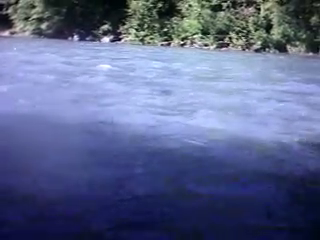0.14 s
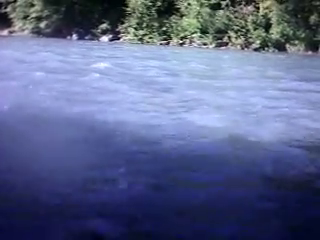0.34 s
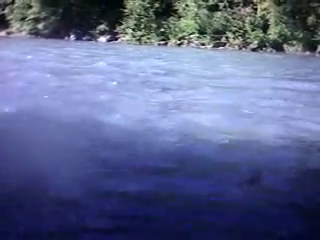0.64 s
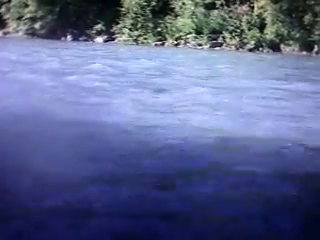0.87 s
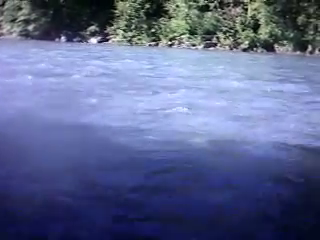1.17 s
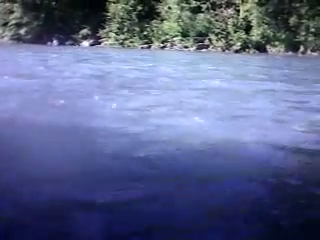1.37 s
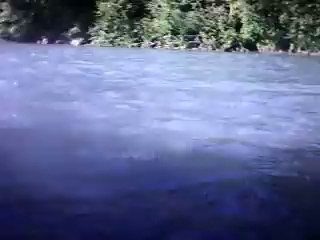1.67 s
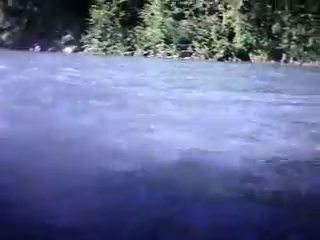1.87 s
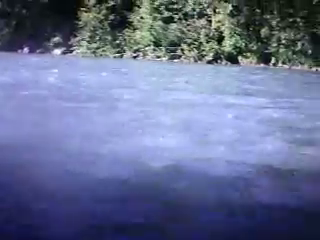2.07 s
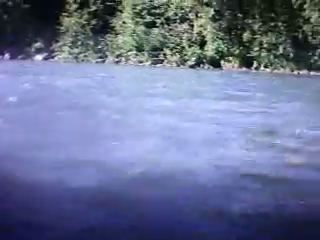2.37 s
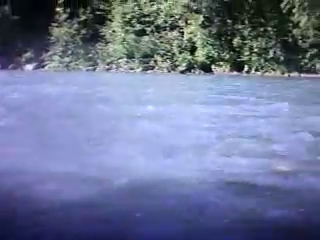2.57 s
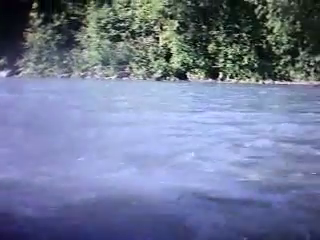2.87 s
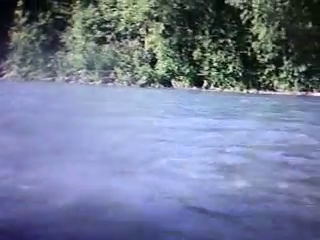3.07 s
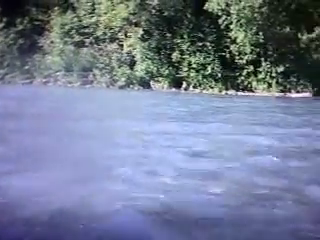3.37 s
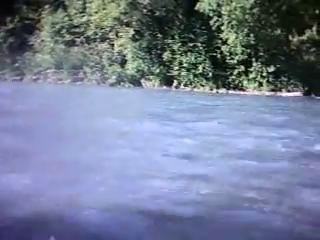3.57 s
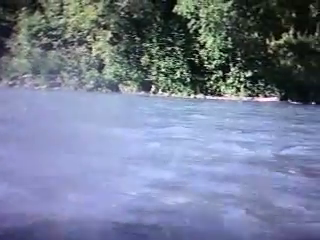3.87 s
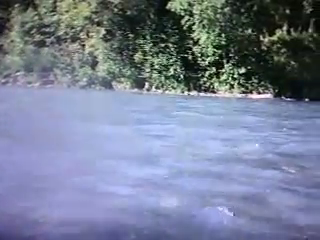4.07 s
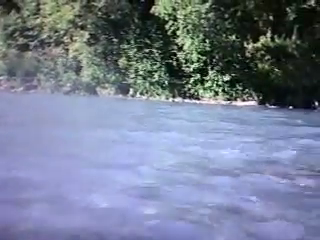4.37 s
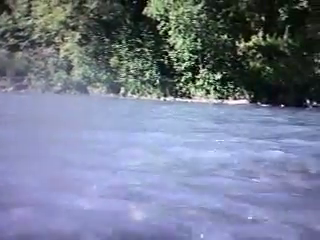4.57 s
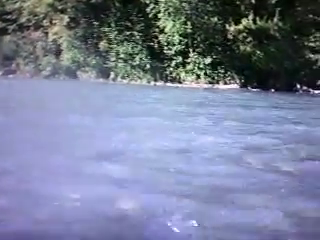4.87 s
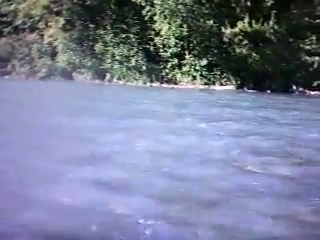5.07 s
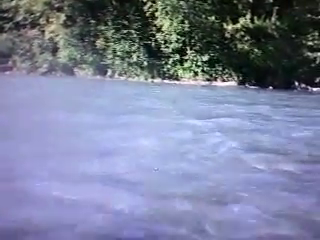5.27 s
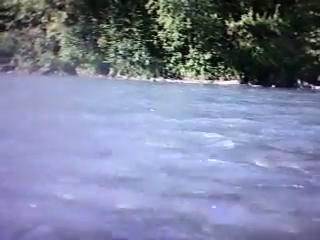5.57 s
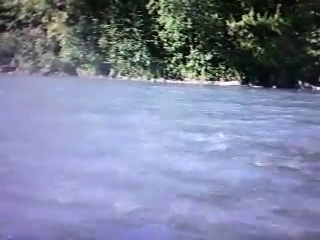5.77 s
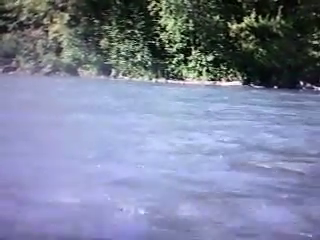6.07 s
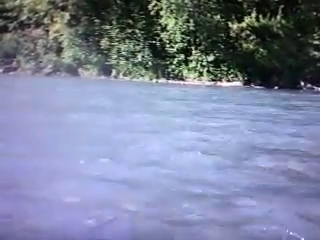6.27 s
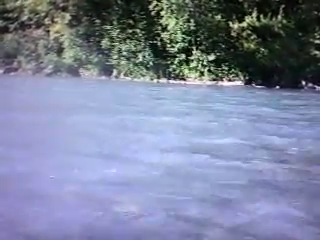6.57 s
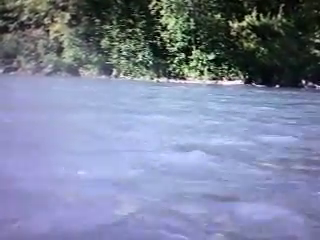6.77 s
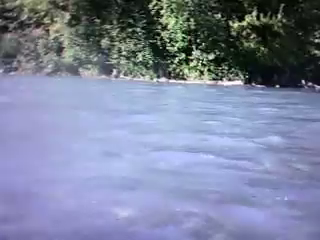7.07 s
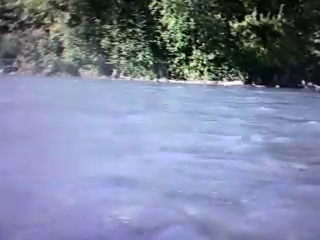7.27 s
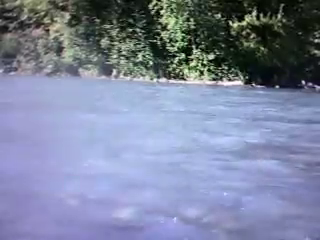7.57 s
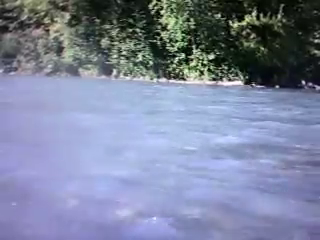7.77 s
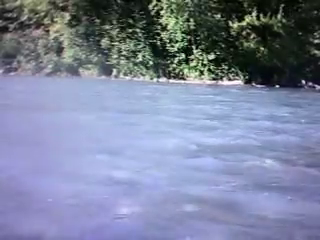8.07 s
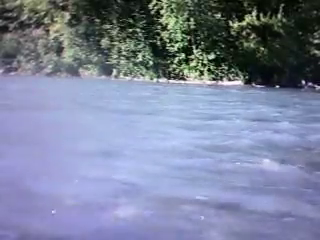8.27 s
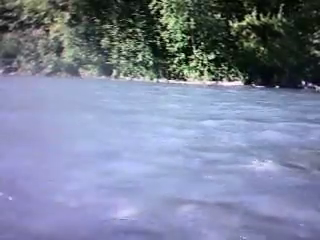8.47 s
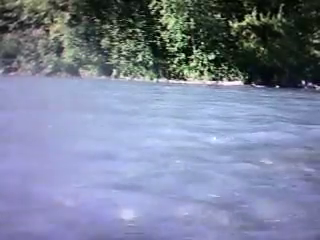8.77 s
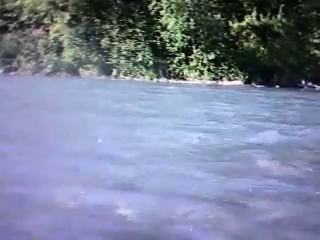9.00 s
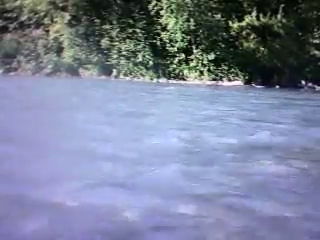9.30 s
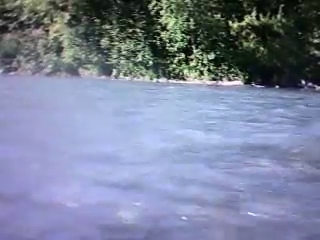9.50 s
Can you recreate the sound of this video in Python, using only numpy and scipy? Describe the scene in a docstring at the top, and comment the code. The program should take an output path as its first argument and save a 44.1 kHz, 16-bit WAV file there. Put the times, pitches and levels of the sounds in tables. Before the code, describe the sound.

A quad bike revs in a river, its exhaust right at the waterline, over a soft, steady rush of current. From the start until about 4.7 seconds come roughly nine quick throttle blips, the longest from 3.6 to 4.2 seconds. Each blows the pipe clear with a hard bark; between them water covers it and the sound becomes a muffled, thumping gurgle. Hollow pops and sharp cracks pepper the revs, with a strong crack near 2.5 seconds. Around 5 seconds the engine sinks into a quieter, lumpy idle with a low drone, a hollow chuff and a faint metallic knock. A drop of spray ticks near 5.4 seconds, a loud pop follows at 5.7 and a weaker one at 8.7. The idle swells slightly toward the end, near 9.5 seconds. The small microphone has little treble and overloads on the barks.

```python
"""A quad bike revs in a river, its exhaust at the waterline: blip after blip, then a lumpy idle.
Each firing thumps in the silencer and puffs out gas, a muffled gurgle while water covers the pipe,
a hard bark when it blows clear. The exhaust pops and cracks; the idle adds a drone and a chuff.
The river is a steady bed with one tick of spray. A small narrow-band microphone overloads on the barks."""
import sys
import numpy as np
from scipy import signal
from scipy.fft import rfft, irfft
from scipy.io import wavfile

SR = 44100
rng = np.random.default_rng(int(sys.argv[2]) if len(sys.argv) > 2 else 0)


def pcm_store(signal):
    """Save signal as 16-bit PCM."""
    levels = np.round(np.clip(np.atleast_2d(signal), -1, 1) * 32767)
    wavfile.write(sys.argv[1], SR, levels.astype(np.int16).T)


N = 425124
T = np.arange(N) / SR

# throttle blips: t/s, hold/s, target firing rate/Hz, pipe open/s, flooding decay/s, gas level/dB
BLIPS = [(-.2, 0.34, 78.8, 0.36, 0.1, 7.5), (.588, .14, 72, 0.16, .08, -5),
         (1.066, 0.32, 79.6, 0.377, 0.046, 3), (1.732, .17, 82.2, 0.2858, 0.064, 3.5),
         (2.02, .12, 88, 0.37, 0.044, -1), (2.497, 0.18, 81.4, .32, 0.011, -2.5),
         (3.053, .11, 77, 0.11, 0.085, 4), (3.586, 0.6, 79.7, 0.97, .08, 3),
         (4.37, .11, 85, .32, 0.08, 2.5)]
# accents on the four firings of a cycle: revved level/dB, idle level/dB
ACCENTS = [(3, -5.5), (1.5, -6), (-1, -4.5), (-0.5, -8.5)]
# resonances rung by the gas: f/Hz, width/Hz, muffled level/dB, clear level/dB, pop level/dB
GAS_MODES = [(261.6, 58, 2.5, -23.5, -3.5), (309, 59, -15, 2, -2), (476, 760, -1.5, -9.5, -12.5),
             (782.8, 35.7, 9.5, -29.5, -0.5), (1024.4, 104, 1, 4, -0.5), (1108.2, 67, 8, 7.5, -5),
             (1136, 13, -34.5, -14.5, -1), (1507, 100, 0, -7, -28), (2196, 130, -41, -6.5, -25),
             (3040, 170, -38.5, -20, -20.5)]
MUFFLED, CLEAR, POP = 2, 3, 4  # its level columns
# tone colour of the river: f/Hz, relative level/dB
RIVER_SPECTRUM = [(100, 17), (250, 3.5), (400, -17.5), (700, 2), (1100, 11), (1500, -8), (1900, -2.5),
                  (2500, -4.5), (3300, -8), (4000, -18)]
# single exhaust pops and cracks, between the blips, during them and at idle:
# t/s, pop level/dB, snap level/dB
EXHAUST_POPS = [(.283, -10, -12), (.34, -8.5, 5.5), (.463, -4.5, -6), (.529, -3.5, 6), (.818, 0, -12),
                (.942, 3.5, -8), (1.011, -3, -11), (1.033, -3, 4), (1.462, -8, 9), (1.487, -2, -17),
                (1.59, -3, -6), (1.607, -3, 6.5), (2.53, -6, 23.5), (2.786, 3, 0), (2.962, -22, -14),
                (3.026, -1, -15), (3.09, -2, 11), (3.255, 1.5, -1.5), (3.322, -6, 6.5), (3.385, 7, 7),
                (3.443, -13, 5), (3.526, -2, 1.5), (4.747, -6, -4), (4.836, -11, -27), (4.983, -15.5, -53),
                (5.288, -18, -45), (5.372, -9.5, -45), (5.699, 8.5, 1), (5.724, -1.5, -12),
                (7.771, -26, -48), (8.345, -33.5, -37), (8.71, -18.5, -34), (8.715, -8, -33)]
# the idle settles, then swells a little: t/s, gas gain/dB, thump gain/dB
IDLE_SWELL = [(4.9, 7, 6), (5.8, 3, 3.5), (6.15, -1, 1), (6.6, -1, 1.5), (7.5, -1, 0.5), (8.3, 1.5, 2),
              (9.64, 3, 1)]
# partials of the idle drone: multiple of the cycle rate, relative level/dB
DRONE_PARTIALS = [(1, -51), (2, -34.5), (3, -39), (4, -12), (5, 0.5), (6, -16), (7, -6), (8, -9.5),
                  (9, -8.5), (10, -12), (11, -8), (12, -8), (13, -11.5)]

CRUISE_HZ, IDLE_HZ, LET_GO_S = 60.02, 43.2, 4.68  # firing rates on light throttle and once it is let go
SPIN_UP_S, SPIN_DOWN_S = .055, .18
CLEAR_S, SURGE_S = 0.038, 0.047  # gas shoves the water off the pipe, hardest at first
THUMP_LEAD_S = 0.037  # the thump builds against the water before the gas gets through
GAS_COVERED_DB, GAS_IDLE_DB, GAS_SURGE_DB = -26, -27, 3
THUMP_COVERED_DB, THUMP_CLEAR_DB, THUMP_IDLE_DB, THUMP_SURGE_DB = -18.5, -13.5, -20.5, 5.5
POP_DECAY_S, POP_SLOWER_DB = 0.0068, 29.5  # weak pops linger: decay at 0 dB, level drop that doubles it
CHUFF_S = 6.0  # one idle chuff lands here


def undb(db):
    """Decibels to gain."""
    return 10 ** (np.asarray(db) / 20)


def unit(x):
    """Scale to rms 1."""
    return x / np.sqrt(np.mean(x ** 2))


def butter(x, hz, kind, order=2):
    """Low-pass or high-pass."""
    return signal.sosfilt(signal.butter(order, hz, kind, fs=SR, output="sos"), x)


def ring(x, hz, width_hz):
    """One resonance, gain 1 at its centre."""
    return signal.lfilter(*signal.iirpeak(hz, hz / width_hz, fs=SR), x)


def wander(rate_hz):
    """Random modulation that glides from value to value."""
    knots = rng.standard_normal(2000)
    return 1.9 * np.interp(T * rate_hz, np.arange(len(knots)), knots)


def puff(age, rise_s, decay_s):
    """Envelope of a flow that opens quickly and dies away."""
    age = np.maximum(age, 0)
    return (1 - np.exp(-age / rise_s)) * np.exp(-age / decay_s)


def firing_rate():
    """Firings per second: the engine spins up quickly on the throttle and runs down slowly off it."""
    moves = []
    for start, hold_s, hz, *_ in BLIPS:
        moves += [(start, hz, SPIN_UP_S), (start + hold_s, CRUISE_HZ, SPIN_DOWN_S)]
    rate = np.full(N, CRUISE_HZ)
    for start, hz, lag_s in moves + [(LET_GO_S, IDLE_HZ, SPIN_DOWN_S)]:
        i = max(int(start * SR), 0)
        rate[i:] = hz + (rate[i] - hz) * np.exp((start - T[i:]) / lag_s)
    return rate


def exhaust_levels(idling):
    """Gas and thump envelopes in dB: each blip blows the pipe clear with a surge, then water returns."""
    def lift(age, open_s, flood_s, rise_db, surge_db):
        age = np.maximum(age, 0)
        clear = np.minimum(age / CLEAR_S, 1) * np.exp(-np.maximum(age - open_s, 0) / flood_s)
        return clear * (rise_db + surge_db * np.exp(-age / SURGE_S))
    gas_db, thump_db = np.zeros((2, N))
    thump_rise_db = THUMP_CLEAR_DB - THUMP_COVERED_DB
    for start, _, _, open_s, flood_s, db in BLIPS:
        gas_lift = lift(T - start, open_s, flood_s, db - GAS_COVERED_DB, GAS_SURGE_DB)
        thump_lift = lift(T - start + THUMP_LEAD_S, open_s, flood_s, thump_rise_db, THUMP_SURGE_DB)
        gas_db, thump_db = np.maximum(gas_db, gas_lift), np.maximum(thump_db, thump_lift)
    times, gas_swell, thump_swell = np.transpose(IDLE_SWELL)
    gas_db += (1 - idling) * GAS_COVERED_DB + idling * (GAS_IDLE_DB + np.interp(T, times, gas_swell))
    thump_db += (1 - idling) * THUMP_COVERED_DB
    thump_db += idling * (THUMP_IDLE_DB + np.interp(T, times, thump_swell))
    return gas_db, thump_db


def engine():
    """Four firings a cycle drive the thump, the gas blast, and at idle the drone and the chuff."""
    rate = firing_rate()
    phase = np.cumsum(rate) / SR
    phase += -phase[int(CHUFF_S * SR)] % len(ACCENTS)  # a cycle begins at the chuff
    firing, age, cycles = phase.astype(int), phase % 1 / rate, phase / len(ACCENTS)
    idling = np.clip((62 - rate) / 15, 0, 1)  # crossfade: 0 revved, 1 at idle
    gas_db, thump_db = exhaust_levels(idling)
    revved_db, idle_db = np.array(ACCENTS)[firing % len(ACCENTS)].T
    accent_db = (1 - idling) * revved_db + idling * idle_db
    low_end = thump(firing, age, idling, accent_db) + undb(-5) * idling * drone(cycles)
    gas = blast(firing, age, idling, gas_db, accent_db)
    return undb(thump_db) * low_end + gas + idling * chuff(cycles, rate)


def thump(firing, age, idling, accent_db):
    """Uneven pressure pulses boom in the silencer and bubble at the pipe's mouth."""
    level_jitter, time_jitter = rng.standard_normal((2000, 2))[firing].T
    size = undb((2.5 - idling) * level_jitter + .3 * accent_db)
    late_s = 0.0012 * np.abs(time_jitter)  # water holds some pulses back
    pulses = butter(size * puff(age - late_s, 0.0023, 0.0015), 28, "high")
    boom = unit(butter(pulses, 230, "low") + 9.5 * ring(pulses, 48.8, 5.5) + 4.25 * ring(pulses, 76.7, 20))
    churn = rng.standard_normal(N) * size * puff(age, 0.0021, .015)
    bubbling = unit(butter(butter(churn, 130, "high"), 246, "low", order=6))
    return undb(4.97 * (1 - idling) - 14 * idling) * boom + undb(-11 - 1.8 * idling) * bubbling


def gas_noise(flow, voicing, top_hz, rush_db):
    """Turbulence follows the flow and rings the resonances over a plain rush; a flow of 1 gives rms 1."""
    def body(x):
        rings = sum(undb(mode[voicing]) * ring(x, mode[0], mode[1]) for mode in GAS_MODES)
        rush = undb(rush_db) * butter(x, 280, "high")
        return butter(rings + rush, top_hz, "low", order=8)
    noise = rng.standard_normal(N)
    return body(noise * flow + 1e-18) / np.std(body(noise[:SR]))


def blast(firing, age, idling, gas_db, accent_db):
    """A puff of gas per firing: weak flow gurgles under water, strong flow blows clear and barks."""
    level_jitter = rng.standard_normal(2000)[firing]
    size = undb((4.5 * (1 - idling) + 1.2 * idling) * level_jitter + accent_db)
    sharp = unit(puff(age, 0.00096, 0.0044) + 0.011) * choke()
    soft = unit(puff(age, 0.00058, 0.031) + 0.58)
    flow = undb(gas_db - 1.5) * size * ((1 - idling) * sharp + idling * soft)
    clear = flow ** 4 / (flow ** 4 + undb(-5) ** 4)  # share of the flow that barks
    gurgle = gas_noise(flow * (1 - clear), MUFFLED, top_hz=1414, rush_db=-21)
    bark = gas_noise(flow * clear, CLEAR, top_hz=3370, rush_db=-10)
    return gurgle + undb(-5) * bark


def river(level_db=-40, splashes_per_s=900):
    """Steady rush of the current, grained by countless small splashes."""
    hits = rng.random(N) < splashes_per_s / SR
    splashes = hits * rng.standard_normal(N) * undb(2.5 * rng.exponential(size=N))
    wash = (rng.standard_normal(N) + undb(-7) * unit(splashes)) * undb(.6 * wander(9))
    hz, db = np.transpose(RIVER_SPECTRUM)
    colour = undb(np.interp(np.log(np.fft.rfftfreq(N, 1 / SR) + 1), np.log(hz), db))
    return undb(level_db) * unit(irfft(rfft(wash) * colour, N))


def pop_cues(blip_pop_db=1, blip_snap_db=5):
    """The listed pops plus one as each blip starts: t/s, pop level/dB, snap level/dB."""
    return EXHAUST_POPS + [(start, blip_pop_db, blip_snap_db) for start, *_ in BLIPS if start > 0]


def choke(dip_db=-14, width_s=0.0058):
    """A quick duck just before each pop, as the water holds the gas back."""
    gain = np.ones(N)
    for start, _, _ in pop_cues():
        span = slice(int(start * SR) - SR // 10, int(start * SR))
        gain[span] *= undb(dip_db * np.exp(-((T[span] - start) / width_s) ** 2))
    return gain


def exhaust_pops():
    """Sudden shots of exhaust gas: a hollow pop, a crack on top, a short gurgling tail of water."""
    pop, snap, tail = np.zeros((3, N))
    for start, pop_db, snap_db in pop_cues():
        span = slice(int(start * SR), int(start * SR) + SR // 4)
        age = T[span] - start
        pop[span] += undb(pop_db) * puff(age, .0006, POP_DECAY_S * 2 ** (-pop_db / POP_SLOWER_DB))
        snap[span] += undb(snap_db) * puff(age - .002, 0.00013, 0.0012)
        tail[span] += undb(-10 + .2 * pop_db) * puff(age, .006, 0.025)
    hollow = butter(gas_noise(pop, POP, top_hz=1530, rush_db=-34), 620, "high")
    crack = butter(snap * rng.standard_normal(N), 3300, "low", order=4)
    gurgle = butter(gas_noise(tail, MUFFLED, top_hz=1250, rush_db=-34), 400, "high", order=1)
    return hollow + crack + undb(6) * ring(crack, 2350, 60) + gurgle


def drone(cycles):
    """At idle the uneven firings sound the low multiples of the cycle rate, each one wavering."""
    tones = np.zeros(N)
    for multiple, db in DRONE_PARTIALS:
        gain = undb(db + 2.3 * wander(5))
        tones += gain * np.sin(2 * np.pi * (multiple * cycles + rng.random()) + 0.62 * wander(7.1))
    return unit(tones)


def chuff(cycles, rate, knock_db=-39, hoot_db=-41):
    """Once a cycle the idle gives a hollow hoot and a soft metallic knock, even but rough in pitch."""
    def note(hz, roughness):
        return np.sin(2 * np.pi * hz * T + roughness * wander(110))
    age = cycles % 1 * len(ACCENTS) / rate
    knock = unit(note(hz=1165, roughness=1.0) * puff(age - .011, 0.0018, .008))
    hoot = unit(note(hz=778, roughness=.6) * puff(age, .002, 0.042))
    return undb(knock_db) * knock + undb(hoot_db) * hoot


def spray_drop(at_s=5.365, gain_db=-13):
    """A single drop of spray ticks close by."""
    tick = rng.standard_normal(N) * puff(T - at_s, .0001, 0.00074)
    return undb(gain_db) * butter(tick, 1200, "high")


def scene():
    """Engine, exhaust pops, spray and river in a mono mix."""
    return (engine() + exhaust_pops() + spray_drop() + river())[None]


def saturate(x, ceiling, knee):
    """Linear for small signals, flat at the ceiling."""
    return x / (1 + np.abs(x / ceiling) ** knee) ** (1 / knee)


def record(dry, band_hz=3940, top_hz=15900):
    """The microphone overloads, the band narrows to speech width, and the overshoots clip once more."""
    crunch = butter(saturate(dry, ceiling=0.5, knee=13), 27, "high", order=1)
    narrow = signal.sosfilt(signal.cheby1(10, .3, band_hz, fs=SR, output="sos"), crunch)
    clipped = saturate(narrow, ceiling=0.71, knee=21)
    return signal.sosfilt(signal.ellip(8, .2, 70, top_hz, fs=SR, output="sos"), clipped)


dry = scene()
out = record(dry)
pcm_store(out)
```